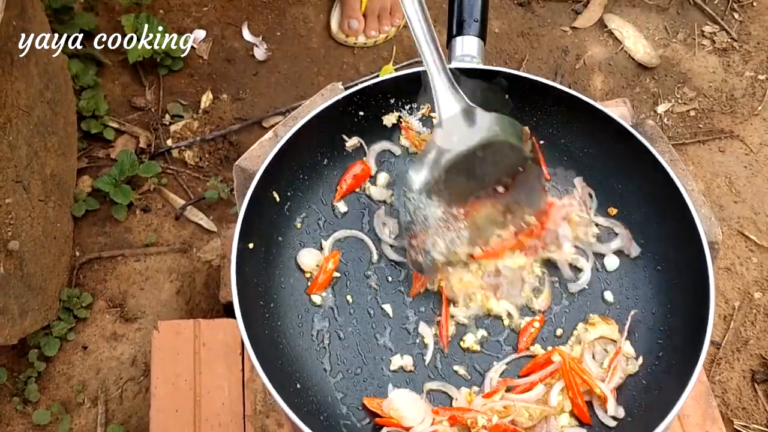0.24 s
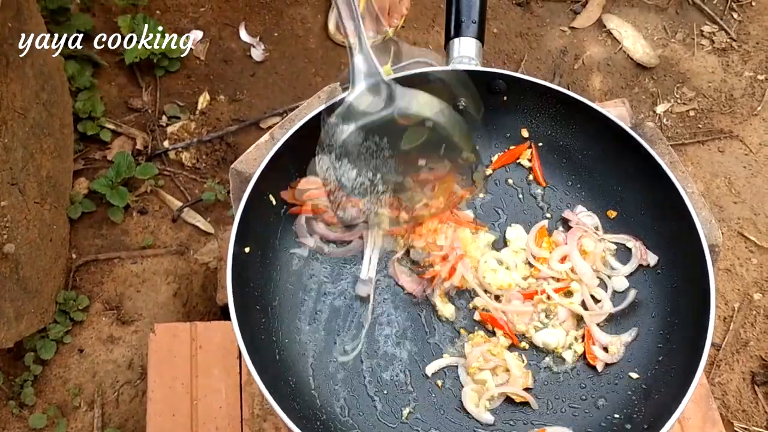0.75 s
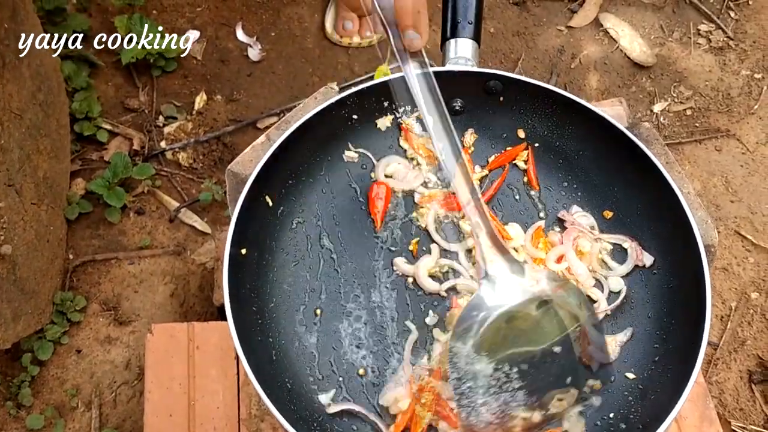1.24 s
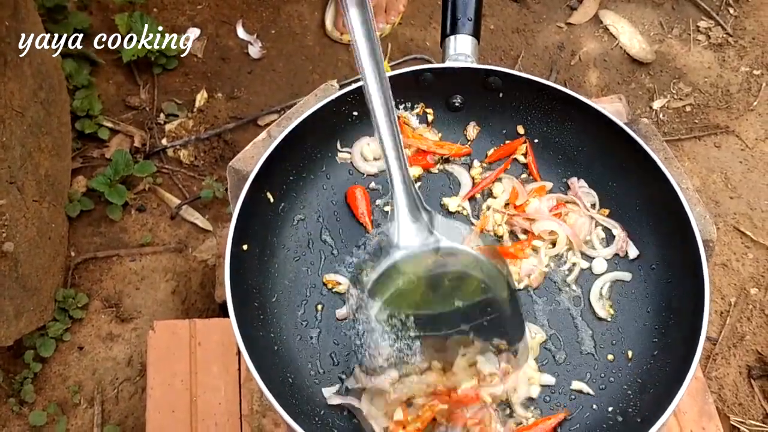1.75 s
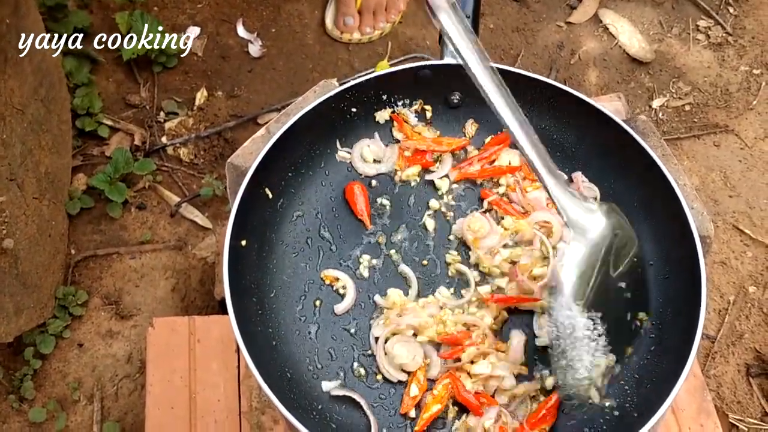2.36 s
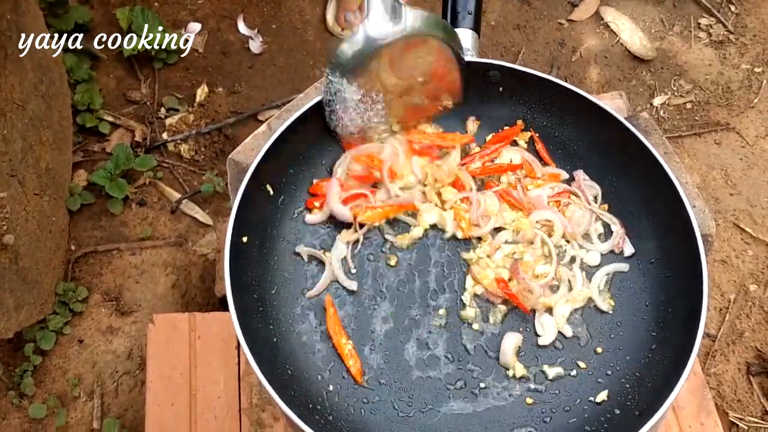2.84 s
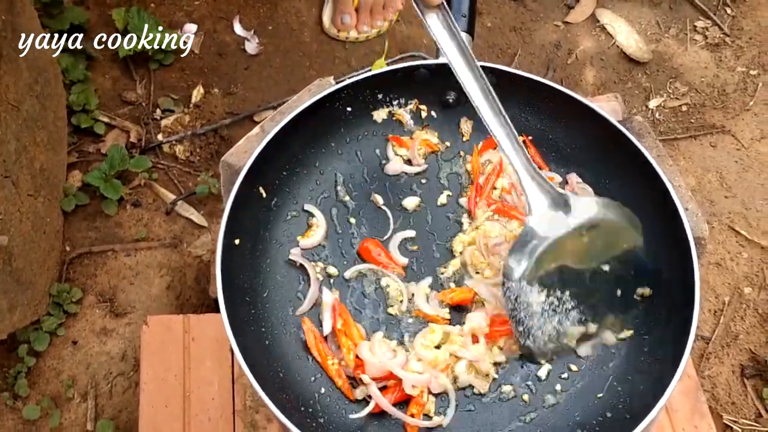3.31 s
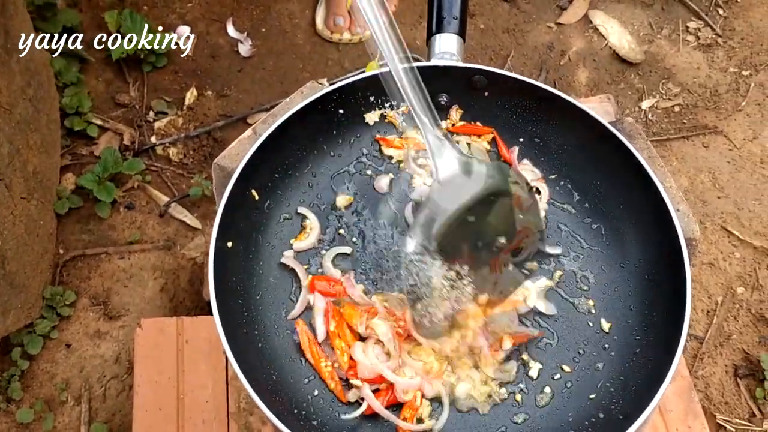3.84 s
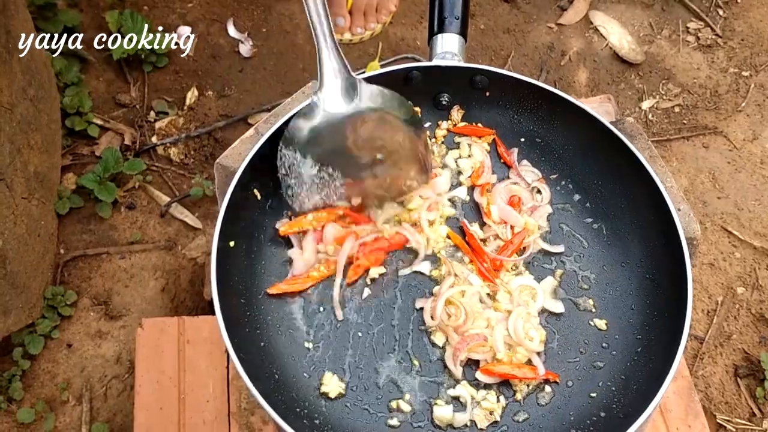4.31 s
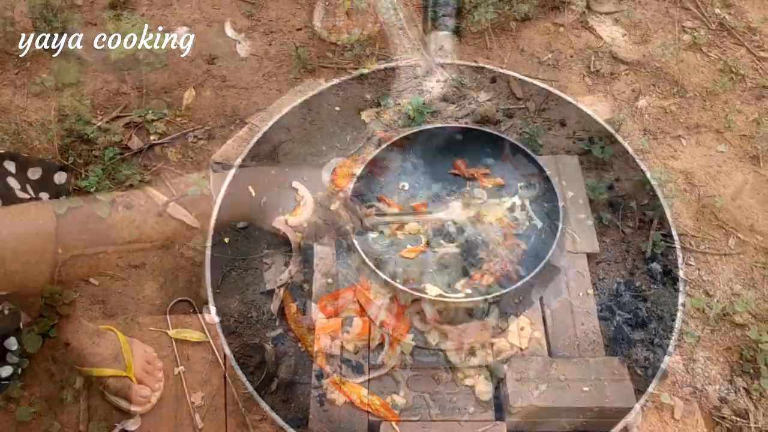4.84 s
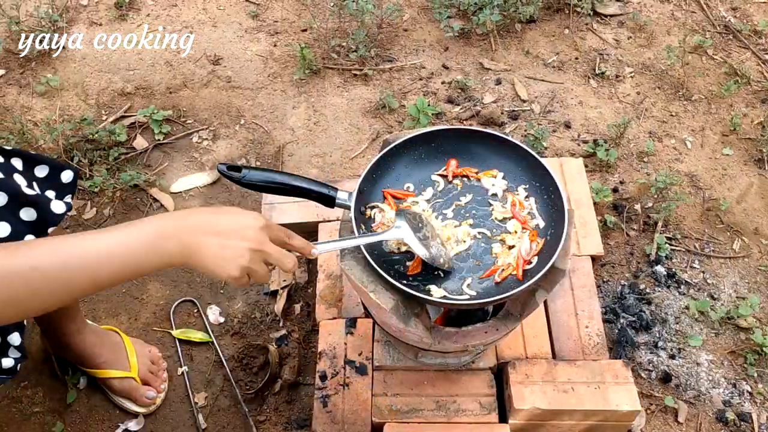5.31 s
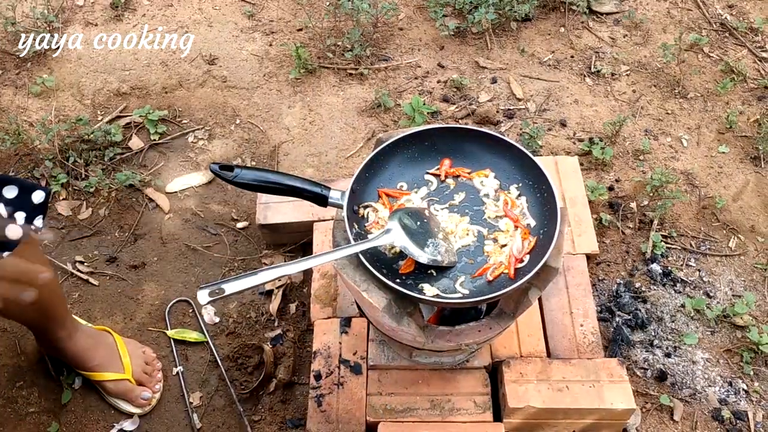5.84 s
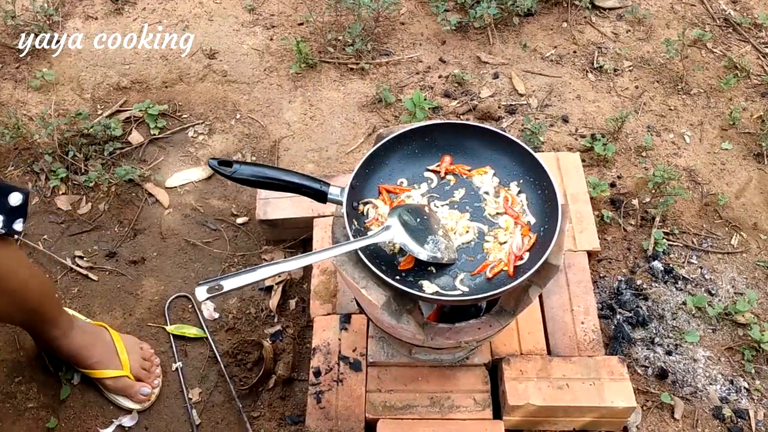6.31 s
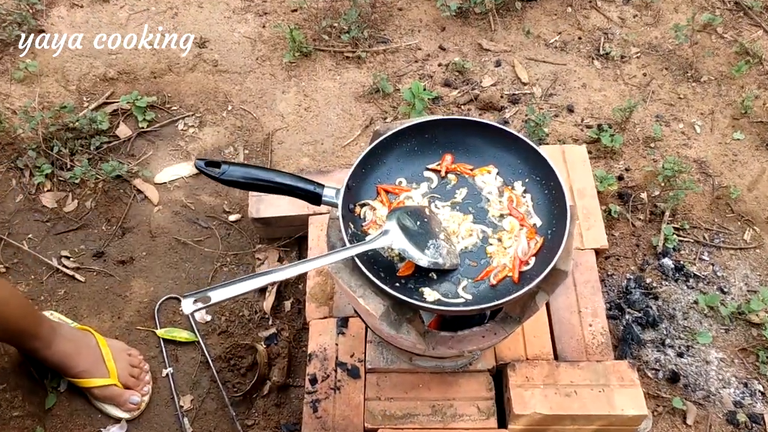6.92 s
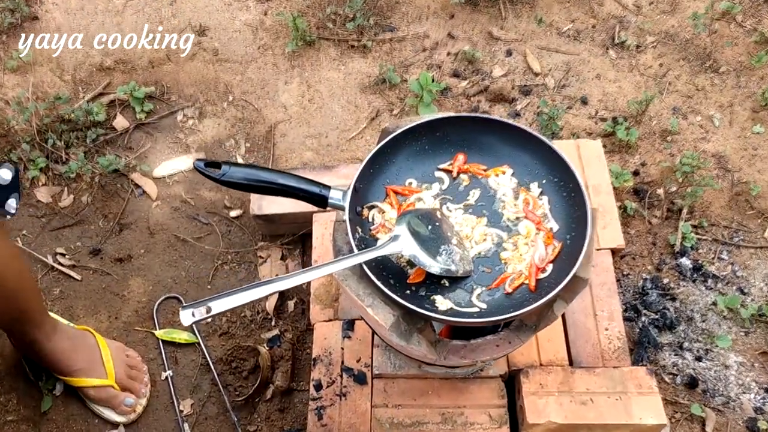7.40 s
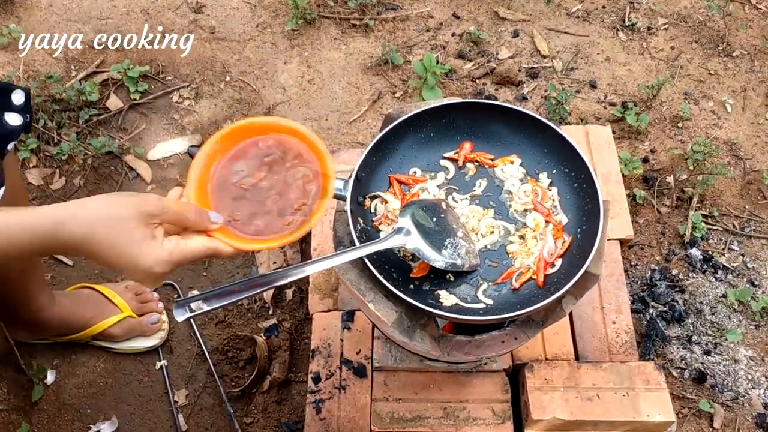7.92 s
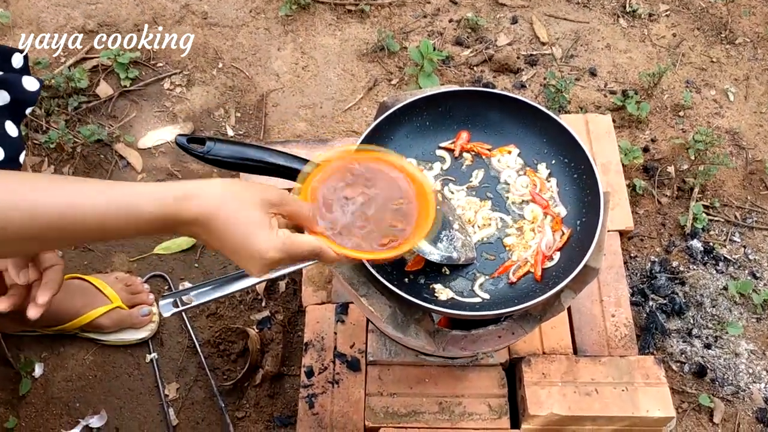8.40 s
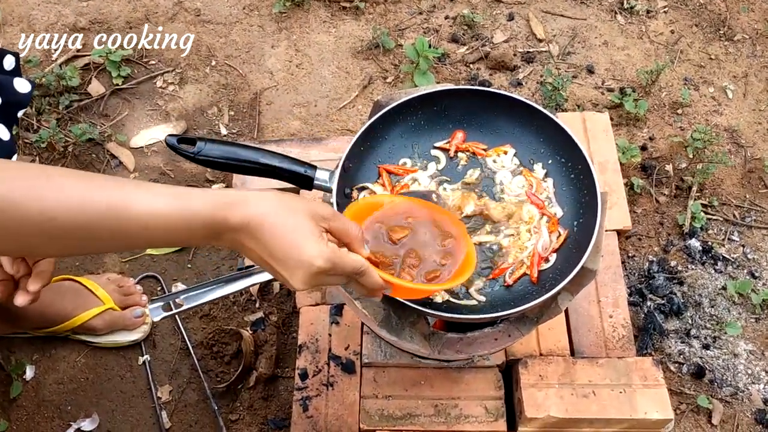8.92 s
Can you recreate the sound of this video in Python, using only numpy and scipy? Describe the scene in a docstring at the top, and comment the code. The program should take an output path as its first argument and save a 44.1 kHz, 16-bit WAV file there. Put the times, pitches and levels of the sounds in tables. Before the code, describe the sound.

Onion, chili and garlic sizzle sharply in a pan as a metal spatula stirs and knocks, then the frying settles outdoors with light wind.

```python
"""Onion, chili and garlic sizzle in oil in a pan over a snapping wood fire, outdoors: grains of noise over haze.
A steel spatula stirs: strokes flare the sizzle; knocks and scrapes ring a bank of damped pan modes.
Then the spatula is laid down, the frying settles before a late revival, and the sound is further off.
Wind, as swelling low noise and single pulses, buffets the microphone. Source levels precede OUTPUT_DB."""
import sys
import numpy as np
from scipy import signal
from scipy.fft import rfft, irfft, next_fast_len
from scipy.io import wavfile
from scipy.ndimage import uniform_filter1d

SR = 44100
rng = np.random.default_rng(int(sys.argv[2]) if len(sys.argv) > 2 else 0)


def dump(signal):
    """Clip the signal to [-1, 1] and save it as 16-bit WAV at the path in sys.argv[1]."""
    limited = np.clip(np.atleast_2d(signal).T, -1, 1)
    pcm = np.round(limited * 32767).astype(np.int16)
    wavfile.write(sys.argv[1], SR, pcm)


N = 403498
TIME = np.arange(N) / SR
EDGE_HZ = 15780  # upper band limit


def gain_of(db):
    """Decibels to amplitude gain."""
    return 10 ** (np.asarray(db) / 20)


def evened(x):
    """Scales to rms 1."""
    return x / np.sqrt(np.mean(x ** 2) + 1e-20)


def curves(rows, t):
    """Interpolates each column of a table, keyed by its first, at times t."""
    s, *columns = np.transpose(rows)
    return [np.interp(t, s, column) for column in columns]


def coloured(x, points):
    """Filters by (Hz, dB) points, interpolated over log frequency."""
    f, db = np.transpose(points)
    size = next_fast_len(len(x))
    hz = np.fft.rfftfreq(size, 1 / SR)
    gain = gain_of(np.interp(np.log(hz + 1), np.log(f), db))
    return irfft(rfft(x, size) * gain, size)[:len(x)]


def band(x, lo_hz, hi_hz, order=2):
    """Causal Butterworth band-pass."""
    edges_hz = [lo_hz, min(hi_hz, SR / 2 - 100)]
    return signal.sosfilt(signal.butter(order, edges_hz, "band", fs=SR, output="sos"), x)


def peaking(x, db, size=128):
    """Scales a short sound so that its loudest window of size samples has rms db."""
    loudest_power = uniform_filter1d(x ** 2, size, mode="constant").max()
    return x * gain_of(db) / np.sqrt(loudest_power + 1e-20)


def add(mix, s, sound):
    """Mixes a sound in at time s."""
    part = mix[max(round(s * SR), 0):][:len(sound)]
    part += sound[:len(part)]


def swell(start, length, db, rise_s, fall_s, sag_db_per_s=0):
    """Power of one swell: it rises, sags slowly while held, then dies away."""
    t = np.maximum(TIME - start, 0)
    rise = np.minimum(t / rise_s, 1)
    held = gain_of(db - sag_db_per_s * np.minimum(t, length))
    release = np.exp(-np.maximum(t - length, 0) / fall_s)
    return (rise * held * release) ** 2


def bursts(centre_hz, width_hz, decay_s, size=256):
    """One row a bursting bubble: a very short puff of noise around its own pitch."""
    t, hz = np.arange(size) / SR, np.fft.rfftfreq(size, 1 / SR)
    noise = rfft(rng.standard_normal((len(centre_hz), size)))
    resonance = 1 / (1 + ((hz - centre_hz[:, None]) / width_hz) ** 2)
    puff = irfft(noise * resonance) * np.exp(-t / decay_s)
    return puff / np.linalg.norm(puff, axis=1, keepdims=True)


# frying spectrum, relative: f/Hz, density/dB per Hz
FRY_SPECTRUM = [(150, -25.5), (400, -33.5), (750, -21.5), (1200, -16), (2000, -11.5), (4000, -12.5),
                (6500, -10), (8350, -1), (9500, -7), (11500, -8), (14000, -4.5), (15500, 2.5)]


def crackle(spread_db, width_hz, decay_s, haze_db, count):
    """Countless bubbles, a few large and most tiny, over the haze of those too small to tell apart."""
    at, pitch = rng.random((count, 2)).T
    sizes = gain_of(spread_db * np.minimum(rng.standard_normal(count), 2.5))
    grains = bursts(pitch * EDGE_HZ, width_hz, decay_s) * sizes[:, None]
    places = (at * N).astype(int)[:, None] + np.arange(grains.shape[1])
    pops = np.bincount(places.ravel(), grains.ravel(), N)[:N]
    haze = gain_of(haze_db) * rng.standard_normal(N)
    return coloured(evened(pops) + haze, FRY_SPECTRUM)


# oil frying by itself: t/s, level/dB
SIMMER_LEVELS = [(0, -45.5), (4.9, -47.5), (5.45, -40), (6.15, -44), (6.7, -47), (8.8, -50), (9.15, -42.5)]
# strokes push wet food onto hot metal: t/s, length/s, sizzle flare level/dB, bubbling re spitting/dB
STIR_STROKES = [(-0.03, 0.044, -40, -10.5), (0.111, 0.13, -39.5, -12), (0.31, .08, -43.5, -13.5),
                (0.507, 0.14, -42, -10.5), (0.711, .35, -42, -12.5), (1.277, 0.3, -43.5, -11),
                (1.648, 0.34, -43, -10), (1.97, 0.38, -40, -8.5), (2.507, 0.17, -45.5, -4.5),
                (2.69, 0.094, -44, -8.5), (2.93, 0.083, -39, -10), (3.057, 0.11, -43.5, -11.5),
                (3.319, 0.29, -41, -15), (3.803, 0.099, -47, -9.5), (4.002, 0.38, -41.5, -12),
                (4.495, 0.24, -42.5, -13), (4.842, 0.031, -40.5, -11), (4.968, 0.094, -42.5, -15)]
FLARE_RISE_S, FLARE_FALL_S, FLARE_SAG_DB_PER_S = 0.031, 0.042, 3
SIMMER_BUBBLING_DB = -62  # under the resting food
SIMMER_WET_DB = -17  # added bubbling re spitting of the oil
SPURT_DB, SPURT_HZ = 1.0, (2, 32.2)  # juice meets the oil in little spurts
CROSSOVER_HZ = 3500


def frying():
    """Fine spitting on the open oil and lower bubbling under the food; both flare with each stroke."""
    spit_power = gain_of(curves(SIMMER_LEVELS, TIME)[0]) ** 2
    bubble_power = gain_of(SIMMER_BUBBLING_DB) ** 2 + gain_of(SIMMER_WET_DB) ** 2 * spit_power
    for start, length, db, wet_db in STIR_STROKES:
        flare = swell(start, length, db, FLARE_RISE_S, FLARE_FALL_S, FLARE_SAG_DB_PER_S)
        spit_power = spit_power + flare
        bubble_power = bubble_power + flare * gain_of(wet_db) ** 2
    fine = crackle(spread_db=9.5, width_hz=4100, decay_s=0.00075, haze_db=1, count=15000)
    spitting = evened(band(fine, CROSSOVER_HZ, SR / 2))
    coarse = crackle(spread_db=6.0, width_hz=920, decay_s=0.0011, haze_db=8.0, count=9000)
    bubbling = evened(band(coarse, 114, CROSSOVER_HZ))
    spurts = gain_of(SPURT_DB * evened(band(rng.standard_normal(N), *SPURT_HZ)))
    return spurts * (np.sqrt(spit_power) * spitting + np.sqrt(bubble_power) * bubbling)


# largest water drops bursting in the oil: t/s, peak level/dB, centre f/Hz
WATER_SPITS = [(0.149, -34.5, 9600), (0.744, -39, 14300), (1.206, -41, 14500), (2.129, -30, 12300),
               (2.594, -34.5, 7750), (3.027, -44, 14900), (3.173, -37, 14200), (3.898, -41, 13700),
               (4.028, -31.5, 12000), (5.581, -38, 14600), (5.797, -32.5, 11800), (6.032, -32, 12500),
               (6.24, -31.5, 14000), (6.38, -49, 15000), (8.213, -37.5, 10200), (8.518, -46, 14180),
               (8.547, -43, 14200)]


def spits():
    """Large drops burst with a sharp tick, which the pan wall throws back."""
    s, db, hz = np.transpose(WATER_SPITS)
    out, t = np.zeros(N), np.arange(512) / SR
    ticks = bursts(hz, width_hz=2800, decay_s=0.0005)
    for when, level, tick in zip(s, db, ticks):
        echo = 0.095 * rng.standard_normal(len(t)) * np.exp(-t / 0.001)
        echo[0] = 1  # direct sound
        sound = band(np.convolve(tick, echo), 1600, EDGE_HZ, order=4)
        add(out, when, peaking(sound, level, size=48))
    return out


# pan modes: f/Hz, nominal level/dB, nominal t60/s
PAN_MODES = [(207, -25, 0.13), (276, -40, 0.1), (492, -10, 0.22), (500, -1, 0.11), (530, 5, 0.062),
             (578, 1.5, 0.14), (662, 5, 0.088), (930, -6, 0.046), (1076, 0, 0.02), (1134, -3.5, 0.22),
             (1293, -13.5, 0.18), (1394, -17, 0.083), (1630, -7.5, 0.035), (1767, -13, 0.054),
             (1793, -1.5, 0.049), (2120, -5.5, 0.11), (2314, -4, 0.073), (2540, -3, 0.1),
             (2814, 8.5, 0.021), (3530, -9.5, 0.071), (3955, -3, 0.036), (4010, -44, 0.023)]
PLACE_DB = 2.5  # how much each spot of the pan favours other modes
THUD_DB, CLINK_DB = -5.5, -1.5  # floor and bright clink re wall ring, neutral contact


def pan(force, db, bright_db, ring, crack_db):
    """A contact force rings the pan's modes; a brighter contact trades the floor's thud for clink."""
    t = np.arange(SR // 3) / SR
    hz, mode_db, t60_s = np.transpose(PAN_MODES)[:, :, None]
    spot_db = PLACE_DB * rng.standard_normal((len(PAN_MODES), 1))
    modes = gain_of(mode_db + spot_db) * np.sin(2 * np.pi * hz * t)
    body = (modes * np.exp(-np.log(1000) * t / (t60_s * max(ring, .2)))).sum(0)
    blade = band(rng.standard_normal(len(t)), 1400, 14400, order=1) * np.exp(-t / 0.0037)
    sound = signal.fftconvolve(force, body + gain_of(crack_db) * blade)
    shares = [(THUD_DB - bright_db, 195, 760), (0, 850, 1550), (CLINK_DB + bright_db, 1600, 10000)]
    return sum(peaking(band(sound, lo, hi, order=3), db + share_db) for share_db, lo, hi in shares)


# knocks, dull with the flat, bright with the edge: t/s, level/dB, brightness/dB, t60 factor
BLADE_KNOCKS = [(0.204, -41.5, 7.5, 0.97), (0.602, -59, -6, .8), (0.659, -46, -2, 0.49),
                (0.964, -40.5, -3, 0.8), (1.298, -60, 4, 0.95), (1.421, -50.5, 3, 0.77),
                (2.464, -33, -0.5, 1.0), (2.526, -31, 1, 0.73), (2.608, -43, -1, .45), (2.883, -43, 5, 0.5),
                (2.901, -45, 5.5, 0.56), (3.353, -28.5, -2, 0.72), (3.468, -42, -0.5, .65),
                (3.727, -41.5, 9.5, 0.31), (4.081, -33.5, -6.5, 0.9), (4.618, -26.5, -1.5, 0.93),
                (4.768, -41, -4.5, 0.37), (4.806, -47.5, -1, 1), (5.069, -46, 7, 0.53),
                (5.605, -41.5, 8, 0.61), (5.638, -47.5, 10, 0.47)]
# blade drags over the pan: t/s, length/s, level/dB, brightness/dB
BLADE_SCRAPES = [(0.654, 0.037, -47, -1), (0.975, 0.029, -51, 6.5), (2.608, 0.097, -45.5, 2.5),
                 (3.36, 0.12, -45.5, -6), (3.735, .055, -46, 1.5), (4.1, 0.029, -50.5, -11.5),
                 (4.655, 0.035, -44, -5), (4.704, 0.1, -43.5, 1), (5.615, .06, -46, 8)]
SCRAPE_RING = 0.28  # t60 factor: the pressing blade damps the pan
SCRAPE_FADE_DB, SLIPS_PER_S = -11.5, 1200  # pressure eases toward the end; mean slip rate


def spatula():
    """Knocks are one blow with a short chatter; scrapes are runs of tiny slips."""
    out, t = np.zeros(N), np.arange(1024) / SR
    for s, db, bright_db, ring in BLADE_KNOCKS:
        force = .05 * rng.standard_normal(len(t)) * np.exp(-t / .004)
        force[0] = 1  # the blow
        add(out, s, pan(force, db, bright_db, ring, crack_db=6.0))
    for s, length, db, bright_db in BLADE_SCRAPES:
        strengths = rng.standard_normal(SR // 4)
        slips = (strengths * (rng.random(SR // 4) < SLIPS_PER_S / SR))[:int(length * SR)]
        force = slips * gain_of(np.linspace(0, SCRAPE_FADE_DB, len(slips)))
        add(out, s, pan(force, db, bright_db, SCRAPE_RING, crack_db=8.0))
    return out


# dry firewood snaps: t/s, peak level/dB
WOOD_SNAPS = [(6.616, -46.5), (6.759, -48), (7.524, -45), (8.498, -50), (8.626, -51.5), (8.874, -48),
              (9.129, -51)]


def fire():
    """The burning wood snaps now and then: decaying bursts of mid-band noise."""
    out, t = np.zeros(N), np.arange(2048) / SR
    for s, db in WOOD_SNAPS:
        snap = band(rng.standard_normal(len(t)), 790, 4000, order=1) * np.exp(-t / 0.0018)
        add(out, s, peaking(snap, db))
    return out


# spectra, relative: f/Hz, density/dB per Hz
AIR_SPECTRUM = [(20, 4.5), (50, -9), (100, -4), (180, -22.5), (400, -19), (1500, -23.5), (6000, -43)]
WIND_SPECTRUM = [(15, -1.5), (40, 4), (80, -6), (130, -14.5), (200, -30.5), (320, -30), (700, -81)]
# gusts on the microphone: t/s, length/s, level/dB
WIND_GUSTS = [(5.34, 0.31, -47), (5.965, 0.3, -47.5), (6.348, 0.09, -42), (6.717, 0.32, -51.5),
              (8.232, 0.63, -43.5)]
# light wind between the gusts, one row: t/s, length/s, level/dB
LIGHT_WIND = (5.15, 3.75, -52.5)
# single eddies that hit the microphone: t/s, peak level/dB, half width/s
WIND_EDDIES = [(7.968, -30, 0.0032), (8.337, -38.5, .0018), (8.396, -26, 0.0027), (8.649, -36.5, 0.0021),
               (8.671, -33.5, 0.0028)]
GUST_RISE_S, GUST_FALL_S = 0.09, 0.046


def wind():
    """Quiet outdoor air, then lumpy gusts and single eddies pressing on the microphone."""
    air = gain_of(-65.5) * evened(coloured(rng.standard_normal(N), AIR_SPECTRUM))
    lumps = gain_of(3.2 * np.clip(evened(band(rng.standard_normal(N), 4, 14)), -2, 1.6))
    buffeting = evened(coloured(rng.standard_normal(N) * lumps, WIND_SPECTRUM))
    power = sum(swell(*gust, GUST_RISE_S, GUST_FALL_S) for gust in [LIGHT_WIND, *WIND_GUSTS])
    out = air + buffeting * np.sqrt(power)
    for s, db, width_s in WIND_EDDIES:
        u = np.arange(-SR // 20, SR // 20) / SR / width_s
        push = (1 - u ** 2) * np.exp(-u ** 2 / 2)  # between two lesser pulls
        add(out, s - 1 / 20, gain_of(db) * push)
    return out


# lowest hollow of two-path sound: t/s, nominal f/Hz, depth/dB
LOWEST_HOLLOW = [(0, 3440, 18.5), (3.12, 3380, 18.5), (3.26, 4470, 21), (3.36, 6700, 2.5), (5.1, 5750, 2),
                 (5.4, 2300, 4), (5.63, 2310, 24), (5.95, 2910, 18), (9.15, 3030, 17)]
# close, then further off: t/s, 2nd and 3rd hollow f re lowest, their depth scale/dB, 8-16 kHz dulling/dB
UPPER_HOLLOWS = [(5.1, 2.57, 2.8, 3.25, -2), (5.45, 2.3, 4.7, 3.6, 0), (5.9, 2.48, 4.15, 10, 0.5),
                 (6.45, 2.37, 4.1, 9.5, 0), (6.75, 2.2, 3.7, 9.6, 0)]


def hollowed(x):
    """Direct and delayed sound cancel at a few pitches, which slide and sway together."""
    hz, t, z = signal.stft(x, SR, nperseg=1024, noverlap=768)
    hz = hz[:, None]
    first_hz, depth_db = curves(LOWEST_HOLLOW, t)
    second, third, upper_db, dull_db = curves(UPPER_HOLLOWS, t)
    sway = evened(uniform_filter1d(rng.standard_normal(len(t)), size=40))
    first_hz = first_hz * (1 + .008 * sway)
    lowest = np.exp(-abs(hz / first_hz - 1) / 0.13)  # sharp null, soft shoulders
    upper = np.exp(-((hz - second * first_hz) / 750) ** 2)
    upper = upper + 0.67 * np.exp(-((hz - third * first_hz) / 1200) ** 2)
    loss_db = depth_db * lowest + upper_db * (upper - .28) + dull_db * (hz - 8000) / 8000
    return signal.istft(z * gain_of(-loss_db), SR, nperseg=1024, noverlap=768)[1][:N]


def scene():
    """Pan and fire through the sliding hollows, with the wind on top."""
    return (hollowed(frying() + spits() + spatula() + fire()) + wind())[None]


# brief level dips: t/s, length/s, depth/dB
LEVEL_DIPS = [(6.689, 0.072, 4.5), (7.147, 0.077, 13), (8.358, 0.075, 4.5), (9.04, 0.08, 6)]
DIP_EDGE_S, OUTPUT_DB = 0.018, 3.5


def record(dry):
    """Applies the output gain, a few brief level dips and the upper band limit."""
    dip_db = 0
    for s, length, depth_db in LEVEL_DIPS:
        inside_s = np.minimum(TIME - s, s + length - TIME)
        dip_db = dip_db + depth_db * np.clip(inside_s / DIP_EDGE_S + .5, 0, 1)
    lowpass = signal.firwin(511, EDGE_HZ, window=("kaiser", 8), fs=SR)
    return signal.oaconvolve(dry * gain_of(OUTPUT_DB - dip_db), lowpass[None], "same")


dry = scene()
out = record(dry)
dump(out)
```